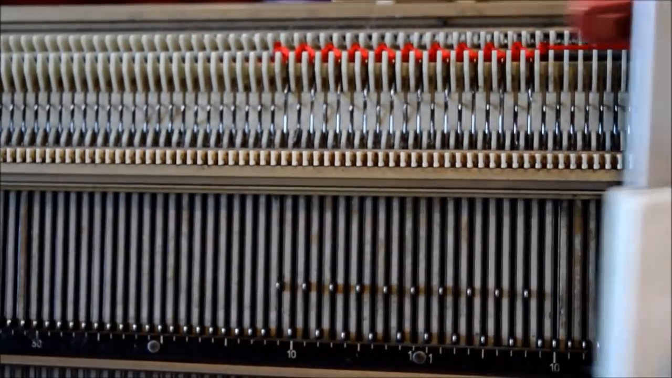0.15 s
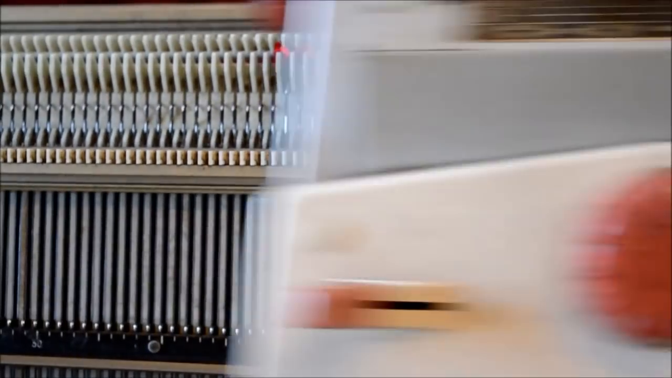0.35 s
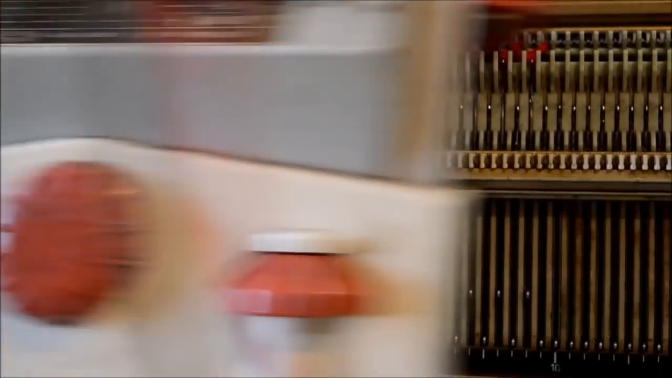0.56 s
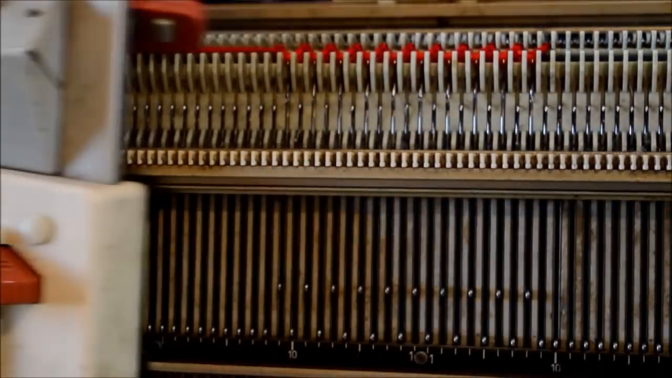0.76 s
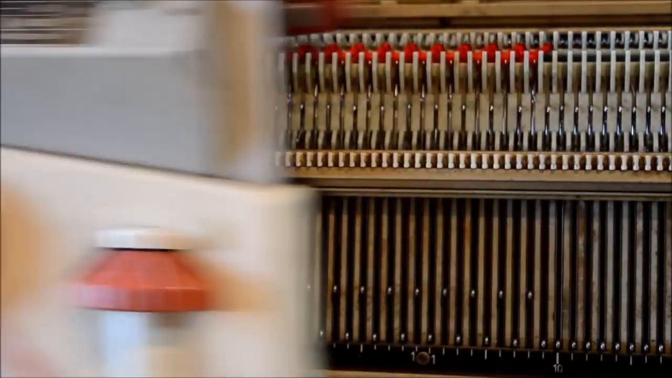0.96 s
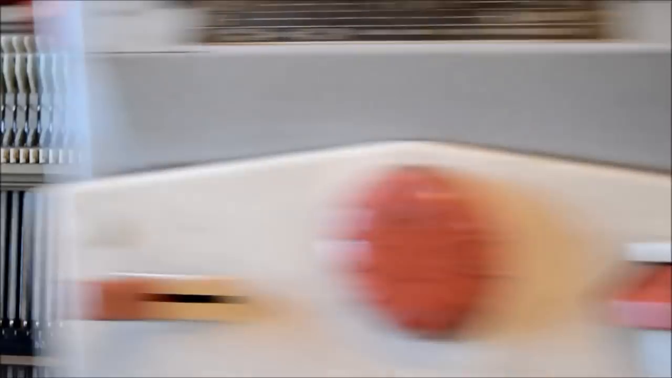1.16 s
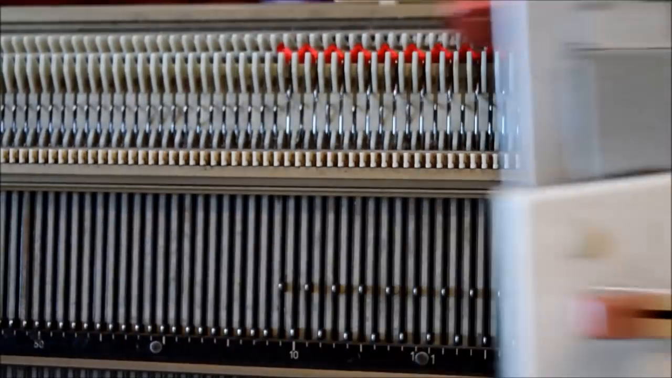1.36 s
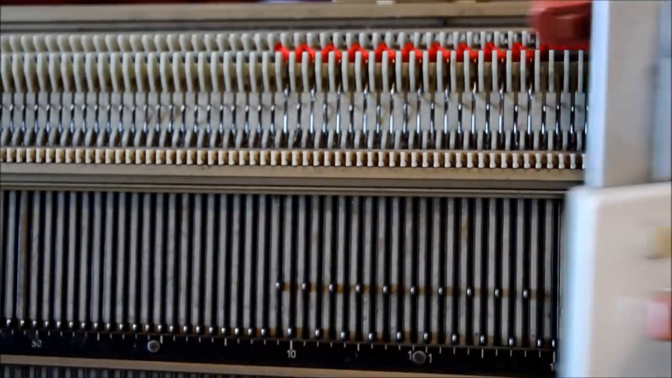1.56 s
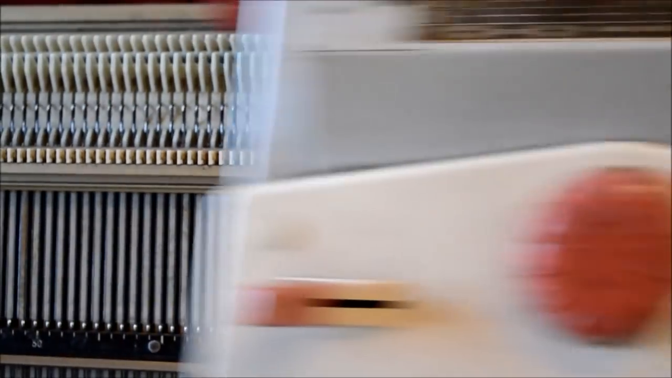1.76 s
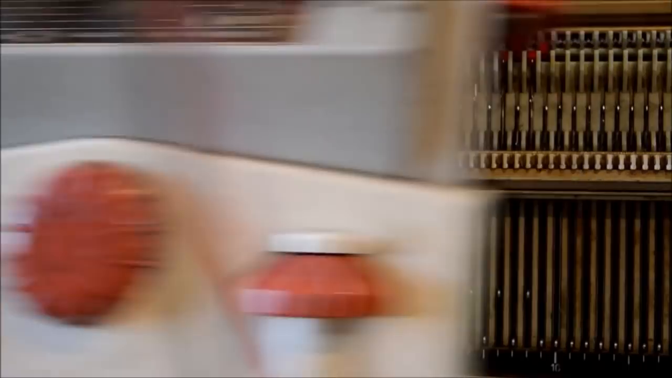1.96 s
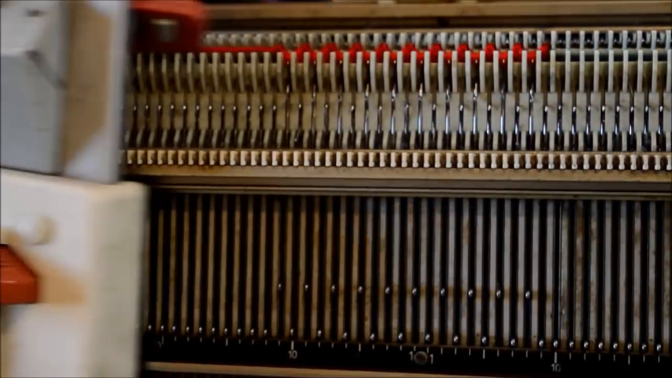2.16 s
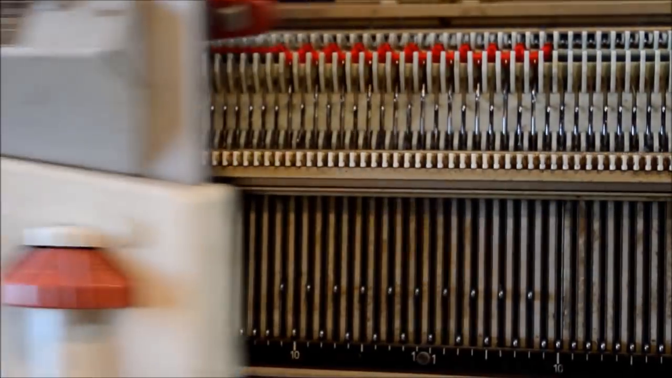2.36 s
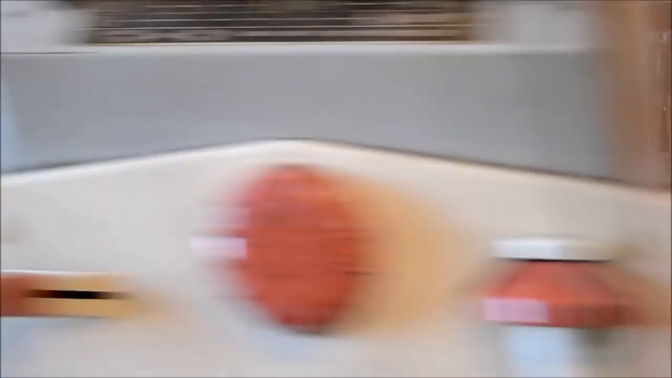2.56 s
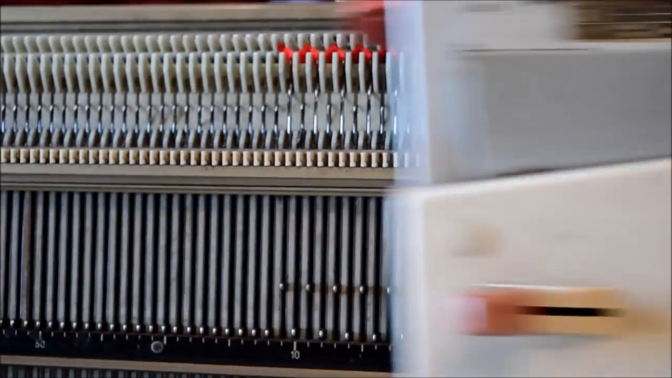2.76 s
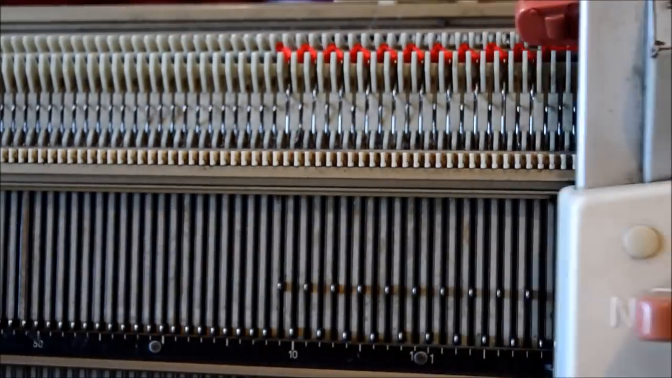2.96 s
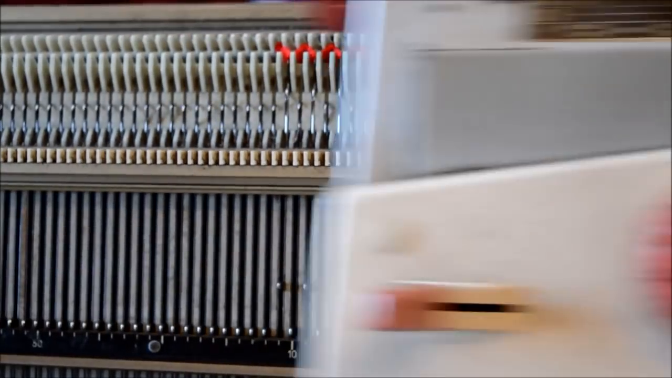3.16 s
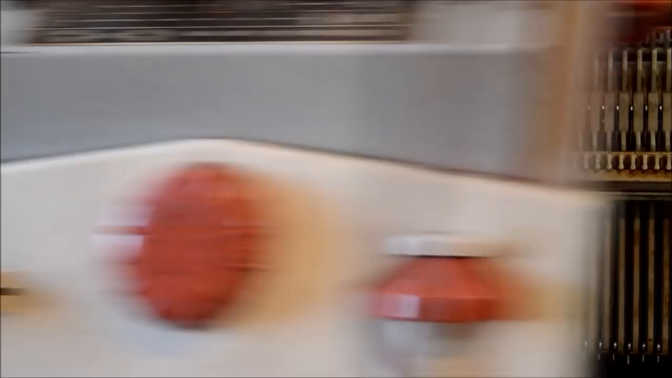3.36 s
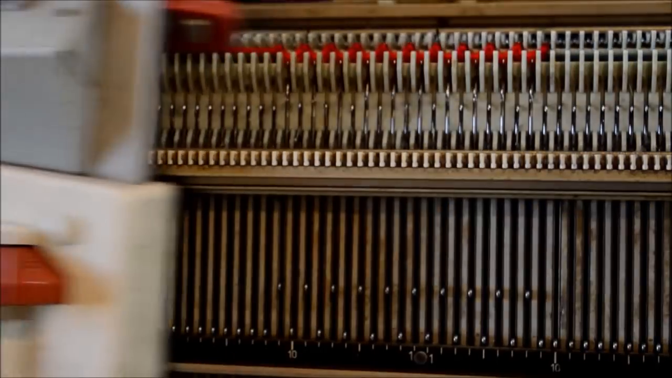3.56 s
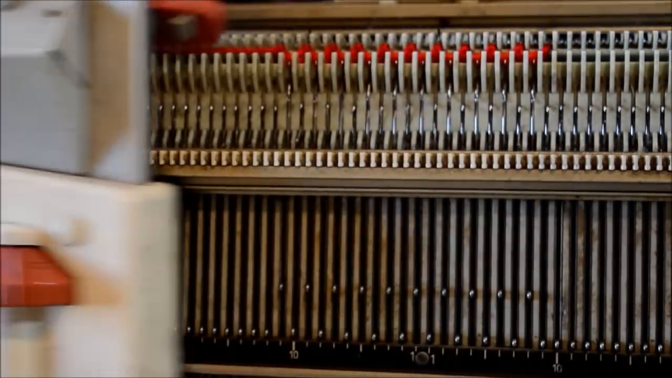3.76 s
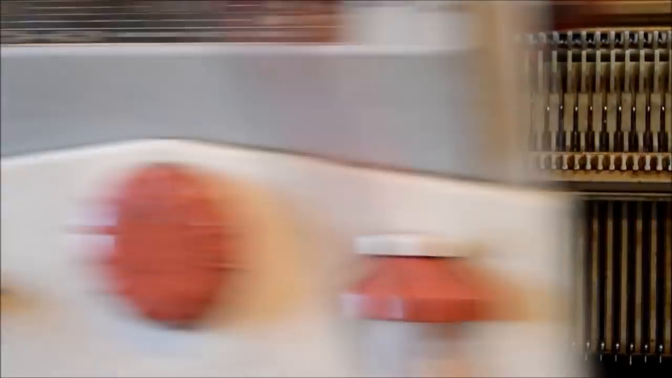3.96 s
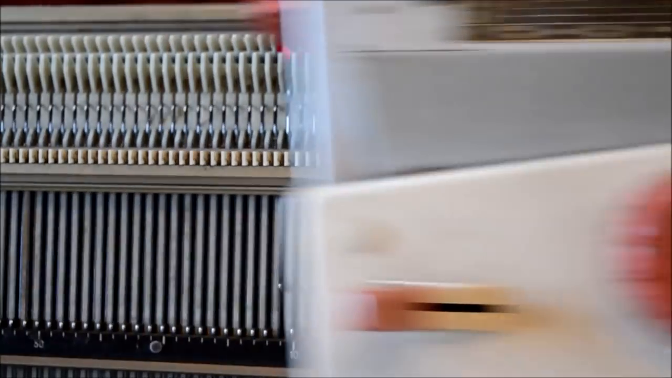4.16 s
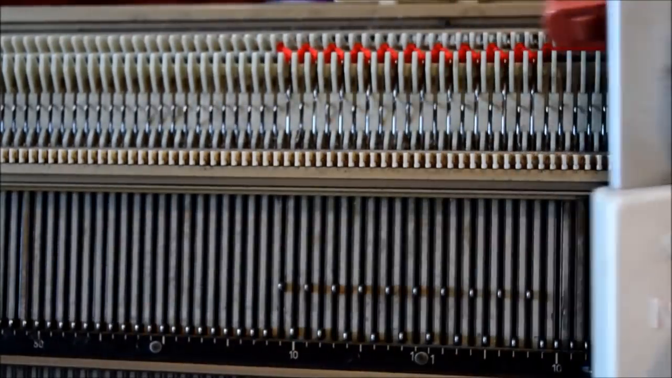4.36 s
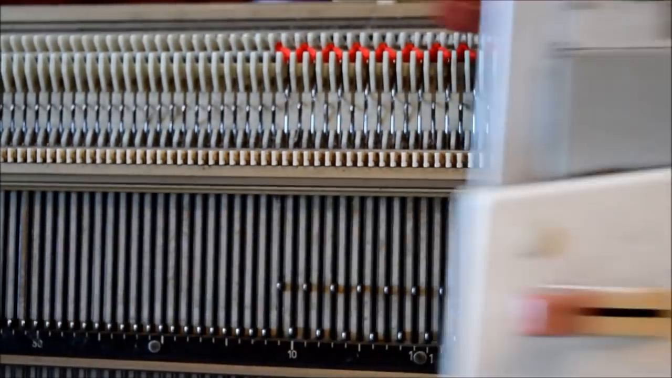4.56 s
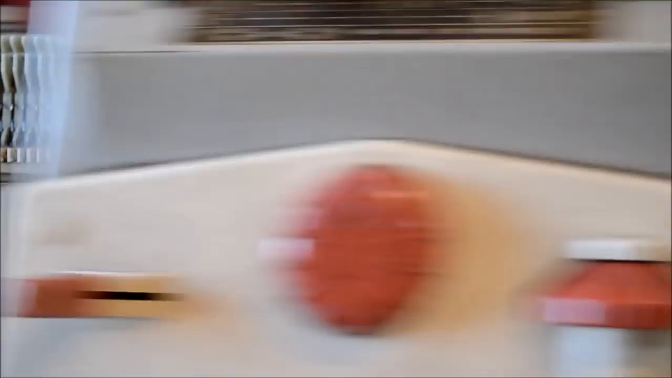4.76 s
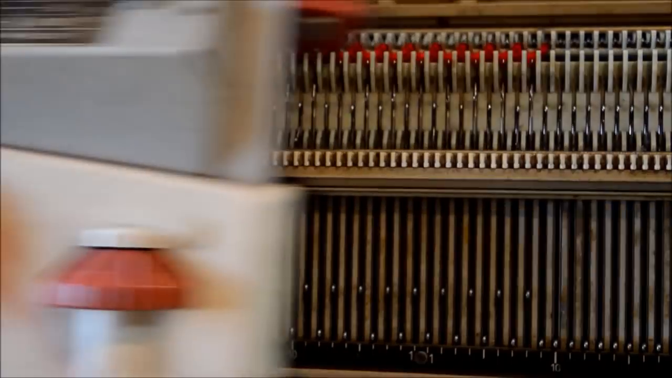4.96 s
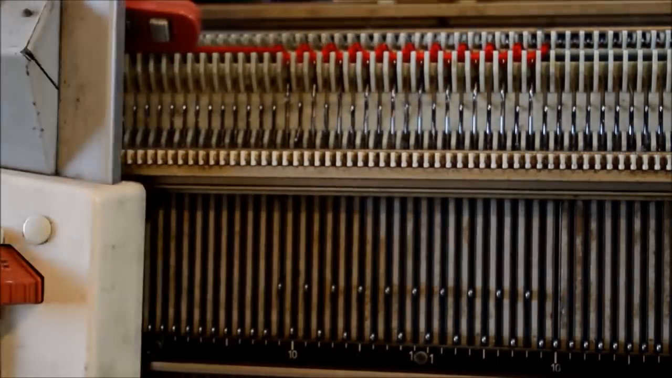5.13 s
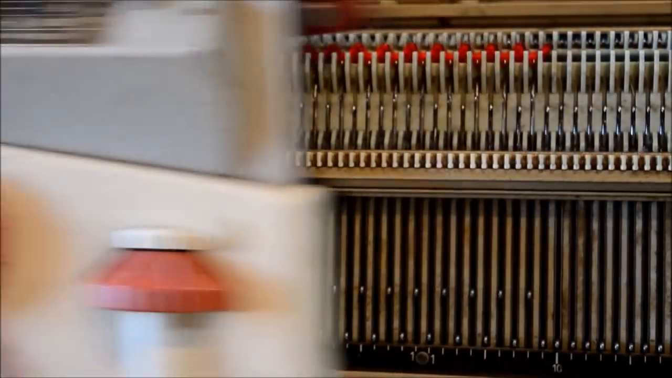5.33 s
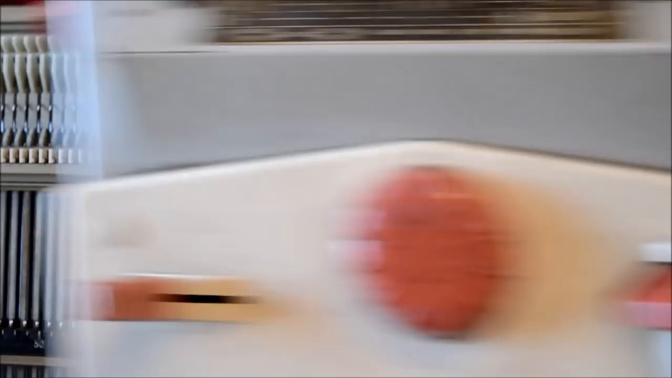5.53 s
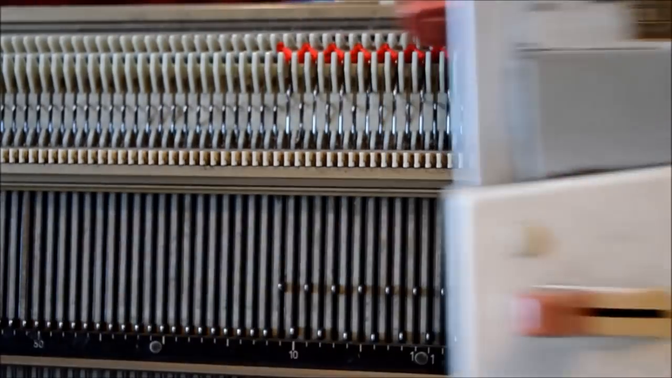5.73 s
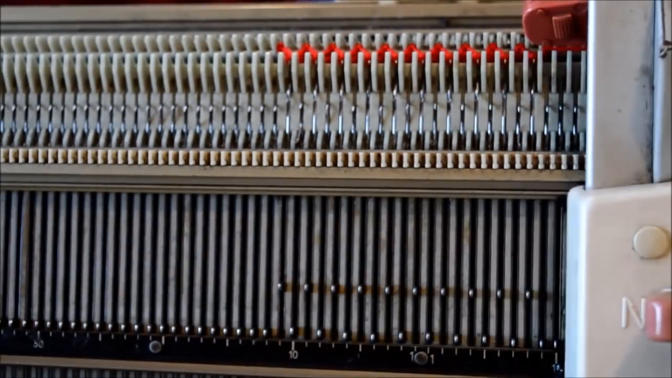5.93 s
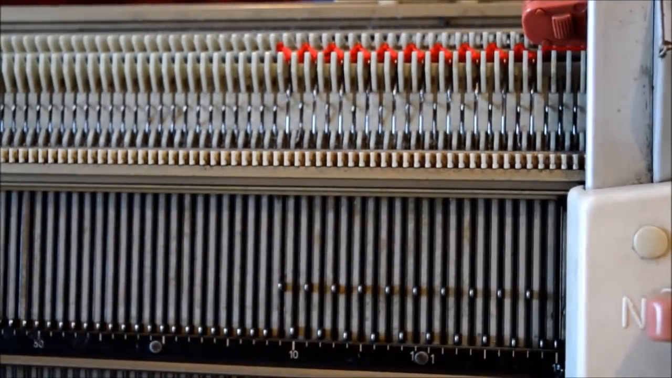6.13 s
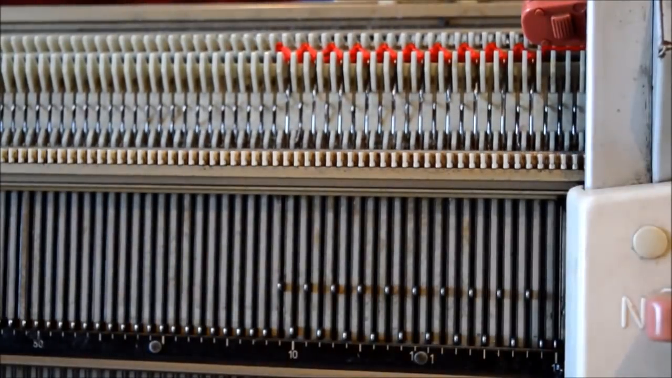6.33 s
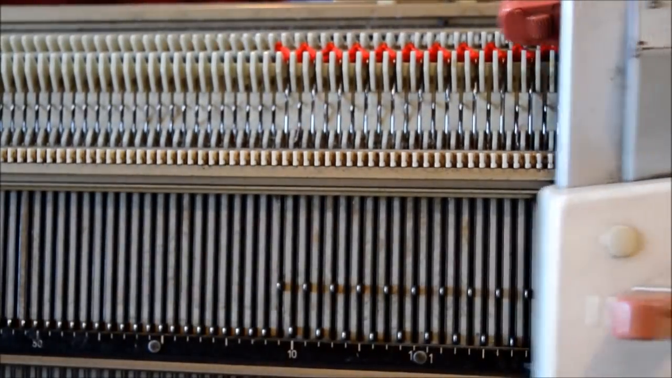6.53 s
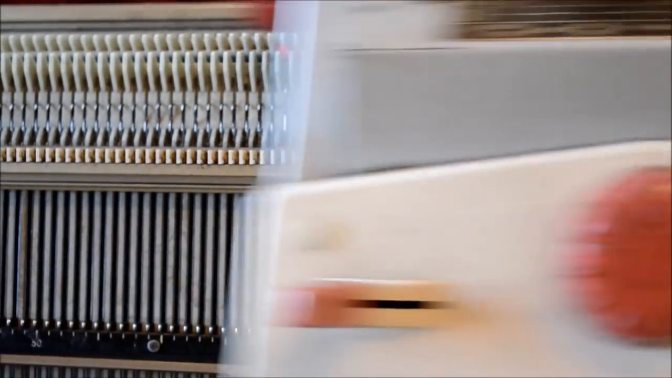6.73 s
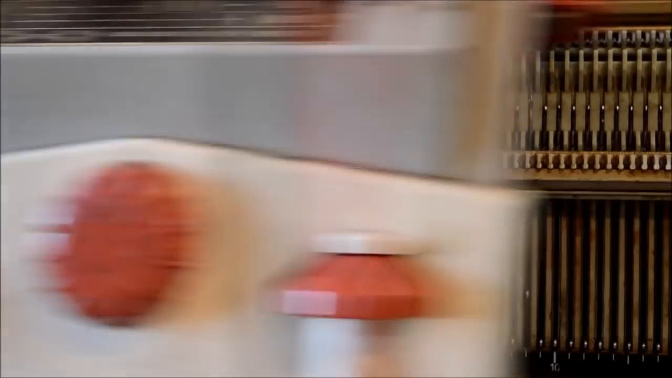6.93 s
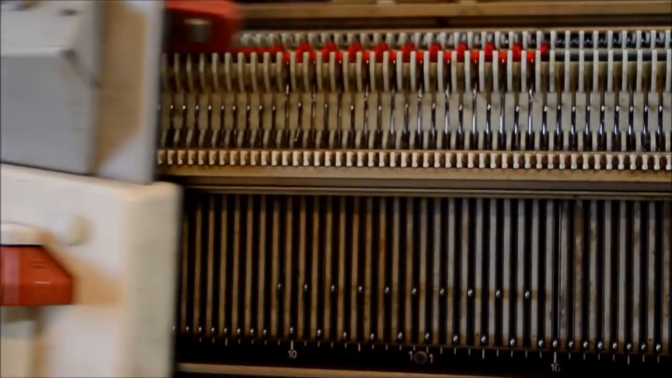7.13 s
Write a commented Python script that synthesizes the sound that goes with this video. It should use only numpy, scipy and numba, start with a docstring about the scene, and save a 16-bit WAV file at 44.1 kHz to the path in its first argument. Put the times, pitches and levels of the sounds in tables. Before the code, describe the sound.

Rapid steel clicks and harsh needle rattle repeat as a hand-pushed knitting carriage slides to and fro in a room, pausing once before a final pass.

```python
"""In a room, a double-bed knitting machine carriage is pushed to and fro by hand, close to the microphone.
Each pass opens with the cams snapping over in a flurry of clicks (scraping noise bursts through resonances);
then needle butts rattle in the cam tracks and the carriage rubs along its rails (random impacts through
resonances), latches and single parts tick, a hand taps once, and delay lines let the room ring on.
Below lie rumble, hiss and a hum that comes and goes. Peaks overload."""
import sys
import numpy as np
from scipy import signal
from scipy.fft import rfft, irfft
from scipy.io import wavfile
from scipy.ndimage import uniform_filter1d
from numba import njit

SR = 44100
rng = np.random.default_rng(int(sys.argv[2]) if len(sys.argv) > 2 else 0)


def transcribe(signal):
    """Save signal, clipped to [-1, 1], as a 16-bit WAV file at the path in sys.argv[1]."""
    frames = np.atleast_2d(signal).T
    limited = np.clip(frames, -1, 1)
    pcm = np.round(limited * 32767).astype(np.int16)
    wavfile.write(sys.argv[1], SR, pcm)


N = 317079
TIME = np.arange(N) / SR

# resonances of the needles: centre_hz, width_hz, level_db
NEEDLE_MODES = [(3410, 2600, -4.5), (6010, 1750, -1), (8170, 3860, -2.5), (10440, 2700, -1.5),
                (13500, 2000, -23.5)]
# carriage strokes: way, force_db, snaps_s (list, the last starts the stroke), ticks_s (list, the last ends it)
STROKES = [ ("right", 0.11, [-0.54], [-0.063]),
           ("left", 0.1, [0.156, 0.175, 0.1868, 0.2075, 0.2125, 0.2287, 0.2433], [0.381, 0.4294, 0.6285]),
           ("right", 0.1, [0.8719, 0.899, 0.9143, 0.9228, 0.9381, 0.9459, 0.957, 0.971],
           [1.0915, 1.1234, 1.3643]), ("left", 0.1, [1.5953, 1.615, 1.6285, 1.655, 1.660, 1.670, 1.6855],
           [1.7998, 1.8525, 2.0588]),
           ("right", 0.1, [2.310, 2.3332, 2.353, 2.3589, 2.3731, 2.3818, 2.3942, 2.4094],
           [2.5002, 2.5341, 2.8206]), ("left", 0.1, [3.062, 3.08, 3.092, 3.1154, 3.121, 3.1403, 3.1522],
           [3.2495, 3.302, 3.502]),
           ("right", 0.1, [3.7668, 3.782, 3.7898, 3.8085, 3.819, 3.832, 3.841, 3.8535],
           [3.947, 3.9814, 4.2676]), ("left", 0.1, [4.523, 4.542, 4.5522, 4.5715, 4.5792, 4.596, 4.606],
           [4.7134, 4.766, 4.9684]),
           ("right", 0.1, [5.2385, 5.252, 5.263, 5.279, 5.292, 5.3047, 5.311, 5.325],
           [5.4081, 5.443, 5.745]), ("left", 1.1, [6.5876, 6.601, 6.6289, 6.6347, 6.6574, 6.6715],
           [6.7765, 6.831, 7.036]), ]
SNAPS_COLUMN, TICKS_COLUMN = 2, 3


def undb(db):
    """Decibels to amplitude."""
    return 10 ** (np.asarray(db) / 20)


def unit(x):
    """Scale to rms 1."""
    return x / np.sqrt(np.mean(x ** 2))


def band(x, hz, width_hz):
    """One resonance, gain 1 at its centre."""
    b, a = signal.iirpeak(min(hz, 0.45 * SR), hz / width_hz, SR)
    return signal.lfilter(b, a, x)


def ring(x, modes):
    """A body: steep resonances of alternating sign, each a narrow and a wide peak in series."""
    out = 0
    for k, (hz, width_hz, db) in enumerate(modes):
        mode = band(band(x, hz, width_hz), hz, 3.54 * width_hz)
        out = out + (-1) ** k * undb(db) * mode
    return out


def decay(x, decay_s):
    """Let each impulse fade exponentially."""
    return signal.lfilter([1], [1, -np.exp(-1 / (decay_s * SR))], x)


def clicks(rate_hz, spread_db, hiss_db):
    """Random impacts, a few much harder than the rest, over rubbing noise; rms 1."""
    hit = rng.random(N) < rate_hz / SR
    hardness = np.minimum(rng.exponential(size=N), 3.5)
    size = undb(spread_db * hardness) * rng.choice([-1, 1], N)
    return unit(unit(hit * size) + undb(hiss_db) * rng.standard_normal(N))


def walk(rate_hz):
    """Random levels held 1 / rate_hz and slewed twice; spread near 1."""
    hold = int(SR / rate_hz)
    steps = np.repeat(rng.standard_normal(N // hold + 1), hold)
    return 1.25 * uniform_filter1d(uniform_filter1d(steps, hold), hold)[:N]


def in_order(column, parts):
    """Rows (start_s, *part) for the snaps or ticks of all strokes, matched from the last one back."""
    rows = []
    for stroke in STROKES:
        way = stroke[0]
        for start_s, part in zip(stroke[column][::-1], parts[way][::-1]):
            if start_s > 0:
                rows.append((start_s, *part))
    return rows


def course():
    """Levels (dB) of rattle, rail, bed, latches: each stroke follows its way's course, then coasts to rest."""
    # per way: share_of_stroke, needle_rattle_db, rail_rumble_db, bed_rumble_db, latch_ticks_db
    way_course = { "left": [(-0.325, -48, -47, -52, -52), (-0.12, -31, -41.5, -41, -45),
                  (0.04, -18.5, -24, -29, -34), (0.2, -18, -21.5, -28.5, -27.5),
                  (0.42, -15, -16.5, -23, -25.5), (0.7, -18, -17.5, -21, -29.5),
                  (0.98, -20, -20, -25.5, -29.5), (1.07, -24.5, -24.5, -29, -41)],
                  "right": [(-0.4, -62, -45, -56, -60), (-0.2, -39, -38, -38.5, -49.5),
                  (-0.1, -21, -32, -39, -45), (0.06, -25.5, -30, -39, -38.5), (0.17, -23, -26, -34, -25.5),
                  (0.37, -14, -16, -25.5, -21), (0.75, -19, -18.5, -21, -33),
                  (0.98, -21, -21, -24.5, -33.5), (1.05, -24, -25, -29, -41.5)], }
    coast_s = 0.22
    # fading of rattle, rail, bed, latches
    coast_db_per_s, rest_db_per_s = (-60, -40, -36, -37), (-115, -80, -70, -200)
    power = 0
    for way, force_db, snaps_s, ticks_s in STROKES:
        share, *levels_db = np.transpose(way_course[way])
        s = snaps_s[-1] + share * (ticks_s[-1] - snaps_s[-1])
        db = np.array([np.interp(TIME, s, level_db, left=-120) for level_db in levels_db])
        db += np.outer(coast_db_per_s, np.clip(TIME - s[-1], 0, coast_s))
        db += np.outer(rest_db_per_s, np.maximum(TIME - s[-1] - coast_s, 0))
        power = power + undb(db + force_db) ** 2
    return 10 * np.log10(power)


def needle_beat(needles_per_s=90, jitter=0.1, spread_db=-0.5, decay_s=0.0025):
    """One working needle after the other meets the cam: a nearly even row of short swells."""
    chance = rng.standard_normal((int(N / SR * needles_per_s * 1.2), 2))
    at = (np.cumsum(1 + jitter * chance[:, 0]) / needles_per_s * SR).astype(int)
    inside = at < N
    beat = np.zeros(N)
    beat[at[inside]] = undb(spread_db * chance[inside, 1])
    return decay(beat, decay_s)


def slide(rattle_db, rail_db, bed_db, bright=0.78, rumble_trim_db=-2.0):
    """Needle butts rattle through the cam tracks; carriage body and needle bed rumble in uneven jolts."""
    # resonances of the carriage body: centre_hz, width_hz, level_db
    body_modes = [(1006, 217, -2), (1240, 268, -3), (1563, 380, -2.5), (1936, 306, -2), (2270, 560, -6)]
    # resonances of the needle bed: centre_hz, width_hz, level_db
    bed_modes = [(172.6, 22, -14.5), (327.3, 65, -12), (448.5, 72, -5), (656.5, 149, 0), (849, 121, -0.5)]
    jolt, beat = walk(60), needle_beat()

    blows = clicks(3000, spread_db=0.5, hiss_db=8.0) * (1 + 0.35 * beat)
    blows *= undb(0.86 * jolt + 1.07 * walk(250))
    rattle = unit(ring(blows, NEEDLE_MODES))
    # slower, softer blows excite the highest resonances less
    dull = signal.filtfilt(*signal.butter(2, 7500, fs=SR), rattle)
    rattle = dull + (rattle - dull) * undb(bright * (rattle_db + 18.5))

    rub = clicks(700, spread_db=2.0, hiss_db=3.0) * (1 + 0.5 * beat)
    rub *= undb(0.91 * jolt + 1.38 * walk(24.94))
    body = unit(ring(rub, body_modes)) * undb(rail_db)
    bed = unit(ring(rub, bed_modes)) * undb(bed_db)
    return rattle * undb(rattle_db) + undb(rumble_trim_db) * (body + bed)


def snaps(rise_s=0.0006, fall_s=0.0055, thump_db=-12):
    """Each cam snap is a short dense scrape of steel on steel that knocks the plastic body and the table."""
    # cam snaps per way, in fixed order: level_db, hold_ms, body_knock_relative_db
    cam_steps = { "left": [(-33, 2.5, -12), (-28, 3, -10), (-30, 3.5, -11), (-22, 3, -12), (-21, 4, -11),
                 (-13, 8, -14), (-4, 6, -8.5)], "right": [(-33, 2.2, -14), (-25, 2.5, -10), (-17, 4, -8),
                 (-16, 3, -11), (-11, 2.2, -13), (-9, 2.2, -18), (-7, 4, -15), (-5, 9.5, -14)], }
    # resonances of the cams: centre_hz, width_hz, level_db
    cam_modes = [(4460, 1540, -6), (5720, 580, 4), (8100, 3100, -4.5), (10620, 1560, 2),
                 (13800, 2800, -19.5)]
    # resonances of the knocked body: centre_hz, width_hz, level_db
    knock_modes = [(854, 370, 2), (1288, 83, 10), (1580, 1650, -1.5), (2413, 17, 6.5)]
    steel_env, body_env = np.zeros(N), np.zeros(N)
    for start_s, db, hold_ms, knock_db in in_order(SNAPS_COLUMN, cam_steps):
        span = slice(int((start_s - 0.003) * SR), int((start_s + 0.073) * SR))
        t = TIME[span] - start_s
        rise = np.minimum(t, 0) / rise_s
        fall = np.maximum(t - hold_ms / 1000, 0) / fall_s
        shape = undb(db) * np.exp(rise - fall)
        steel_env[span] += shape
        body_env[span] += shape * undb(knock_db)
    scrape = unit(ring(clicks(6000, spread_db=5.0, hiss_db=-6.5), cam_modes))
    noise = rng.standard_normal(N)
    knock = ring(body_env * noise, knock_modes) / np.std(ring(noise, knock_modes))
    # the push of the hardest snaps thumps the table
    thump = undb(thump_db) * ring(steel_env * body_env, [(139.6, 200, 0)])
    return steel_env * scrape + knock + thump


def ticks(crack_s=0.0016, wide_db=-5, trim_db=-2.5):
    """A brief crack rings the struck steel part and sprays treble."""
    # ticking parts per way, in the order met: relative_peak_db, ring_hz, sharpness_q
    parts = {"left": [(2.5, 7900, 12), (0.5, 9000, 7), (-1, 5000, 11)], "right": [(0, 9800, 9),
             (1.5, 11400, 10), (-0.5, 4250, 10)]}
    out, t = np.zeros(N), np.arange(int(0.03 * SR)) / SR
    for start_s, db, hz, q in in_order(TICKS_COLUMN, parts):
        crack = rng.standard_normal(len(t)) * np.exp(-t / crack_s)
        part_ring = band(crack, hz, hz / q) * np.sqrt(q)
        spray = unit(ring(crack, NEEDLE_MODES[1:4])) * np.std(crack)
        tick = part_ring + undb(wide_db) * spray
        i = int(start_s * SR)
        out[i:i + len(t)] += undb(db + trim_db) * tick / np.abs(tick).max()
    return out


def latches(latch_db, rate_hz=70, ring_hz=10800, width_hz=3000):
    """Needle latches flip with thin ticks at random moments."""
    hit = (rng.random(N) < rate_hz / SR) * undb(3.0 * rng.standard_normal(N))
    burst = decay(hit, 0.0012) * rng.standard_normal(N)
    thin = band(band(burst, ring_hz, width_hz), ring_hz, width_hz)
    return unit(thin) * undb(latch_db)


def tap(crack_s=0.0017, tail_s=0.074, tail_db=-35):
    """A hand lands on the carriage: a dull knock with a short rustle after it."""
    # the tap: start_s, knock_peak_db
    tap_event = (6.4545, -19.5)
    # resonances of the tapped carriage: centre_hz, width_hz, level_db
    tap_modes = [(210, 140, 0), (700, 300, -6), (1900, 200, 4), (4500, 2300, -20)]
    start_s, peak_db = tap_event
    t = np.maximum(TIME - start_s, 0)
    begun = t > 0
    knock = ring(begun * np.exp(-t / crack_s) * rng.standard_normal(N), tap_modes)
    rub = unit(ring(rng.standard_normal(N), [(600, 700, 1), (1900, 1050, -5), (4800, 2500, -13)]))
    rustle = begun * np.exp(-t / tail_s) * rub
    return undb(peak_db) * knock / np.abs(knock).max() + undb(tail_db) * rustle


@njit
def walls(x, lags, gain, damp):
    """Wall echoes: eight delay lines that feed each other, duller on every round."""
    line, soft, out = np.zeros((8, 4096)), np.zeros(8), np.zeros(len(x))
    for i in range(len(x)):
        total = 0.
        for k in range(8):
            echo = gain[k] * line[k, (i - lags[k]) & 4095]
            soft[k] += (1 - damp) * (echo - soft[k])
            total += soft[k]
        out[i] = soft[0] - soft[3] + soft[5] - soft[6]
        for k in range(8):
            line[k, i & 4095] = x[i] + soft[k] - total / 4
    return out


def echoes(machine, undamped_t60_s=1.0, damp=0.19):
    """The room rings on: random wall delays, each with the loss that its length brings."""
    lags = rng.integers(700, 2600, 8)  # samples
    return walls(machine, lags, undb(-60 * lags / SR / undamped_t60_s), damp)


def quiet(rumble_db=-47.5, hiss_db=-61, hum_hz=49):
    """The still room: low rumble that wavers, a hum that comes and goes, and the microphone's hiss."""
    # spectrum of the room rumble: freq_hz, relative_density_db
    rumble_spectrum = [(25, -18.5), (75, -9), (180, -7.5), (700, -14), (2500, -27), (5000, -43.5),
                       (11000, -47)]
    # course of the hum: time_s, level_db
    hum_course = [(0, -57), (1.0, -54), (1.2, -66), (1.6, -50), (1.9, -70), (4.2, -61), (4.55, -48),
                  (5.0, -60), (5.6, -67.5), (5.95, -49), (6.4, -60), (7.19, -63)]
    hz, db = np.transpose(rumble_spectrum)
    f = np.maximum(np.arange(N // 2 + 1) * SR / N, 1)
    shape = undb(np.interp(np.log(f), np.log(hz), db, right=-np.inf))
    rumble = unit(irfft(rfft(rng.standard_normal(N)) * shape, N)) * undb(rumble_db + 2.6 * walk(3))
    hiss = undb(hiss_db) * rng.standard_normal(N)
    cycles = np.cumsum(hum_hz * (1 + 0.02 * walk(6))) / SR
    hum = np.sqrt(2) * np.sin(2 * np.pi * cycles)
    return rumble + hiss + hum * undb(np.interp(TIME, *np.transpose(hum_course)))


def scene(room_db=-16):
    """The machine, its echo from the walls and the still room."""
    rattle_db, rail_db, bed_db, latch_db = course()
    machine = slide(rattle_db, rail_db, bed_db) + snaps() + ticks() + latches(latch_db) + tap()
    return (machine + undb(room_db) * echoes(machine) + quiet())[None]


def record(dry, clip_level=0.92, top_hz=15700):
    """The input clips just under full scale and the top is cut."""
    top_cut = signal.ellip(12, 0.2, 80, top_hz, fs=SR, output="sos")
    return signal.sosfilt(top_cut, np.clip(dry, -clip_level, clip_level))


dry = scene()
out = record(dry)
transcribe(out)
```